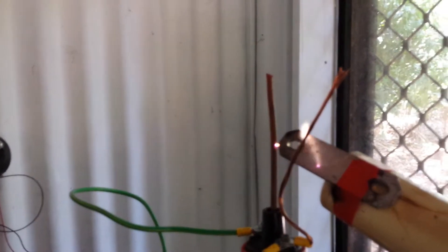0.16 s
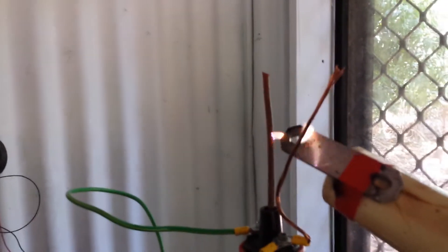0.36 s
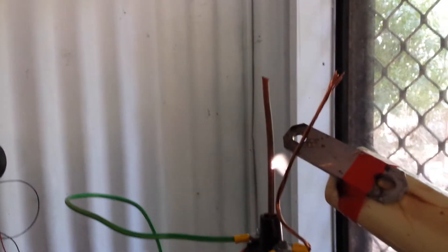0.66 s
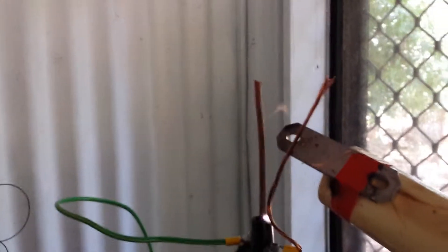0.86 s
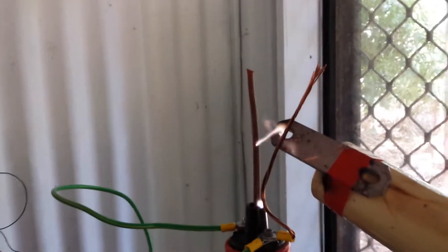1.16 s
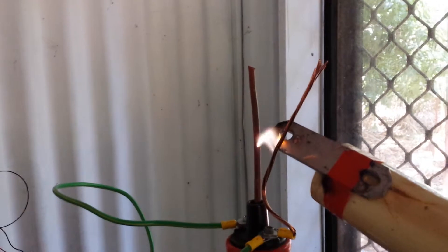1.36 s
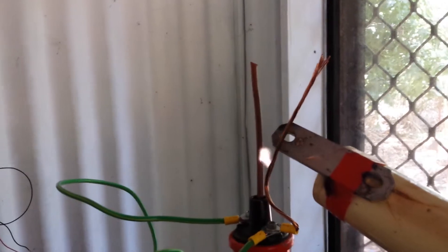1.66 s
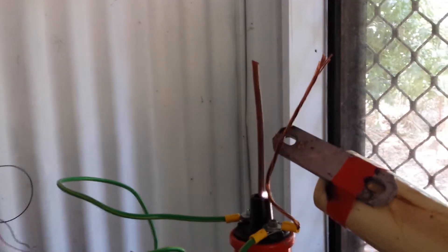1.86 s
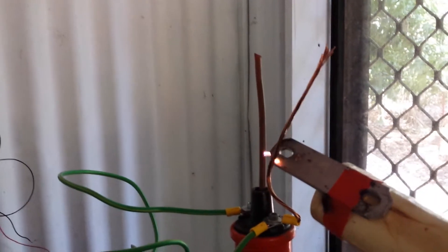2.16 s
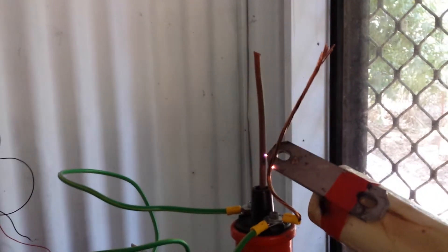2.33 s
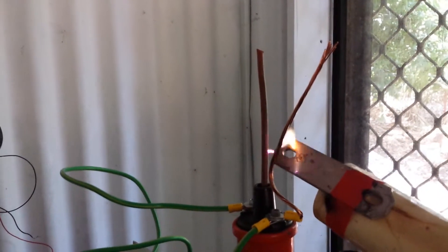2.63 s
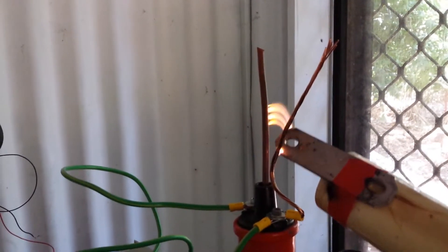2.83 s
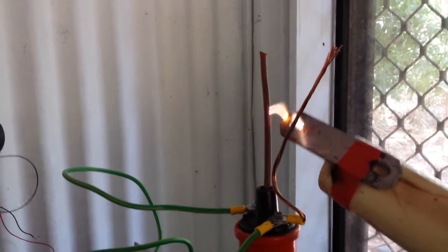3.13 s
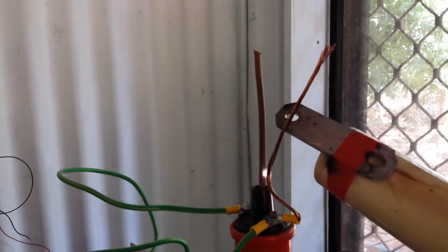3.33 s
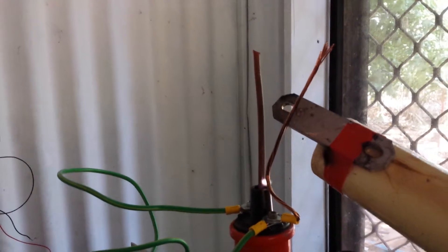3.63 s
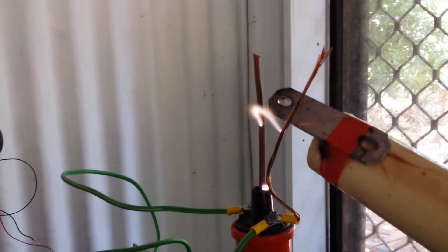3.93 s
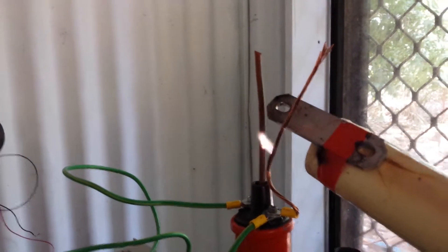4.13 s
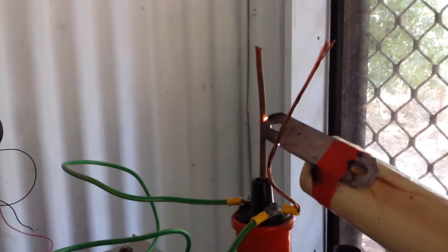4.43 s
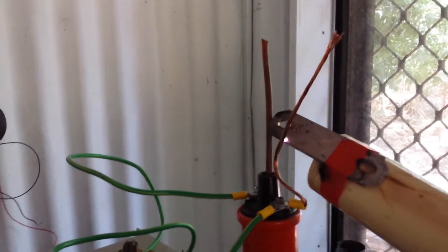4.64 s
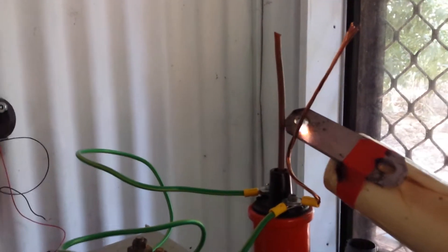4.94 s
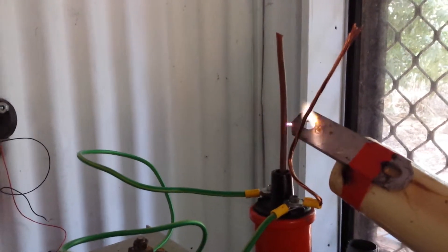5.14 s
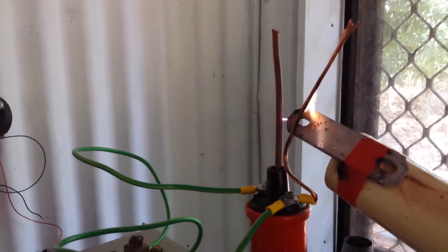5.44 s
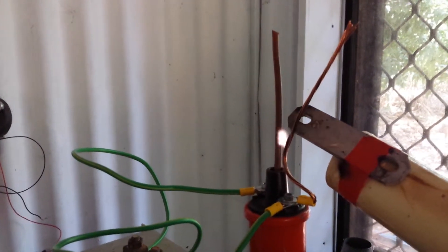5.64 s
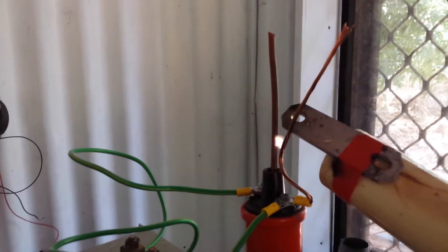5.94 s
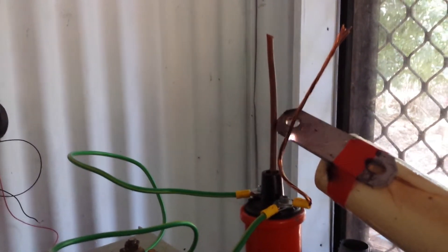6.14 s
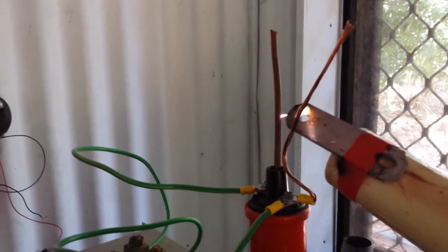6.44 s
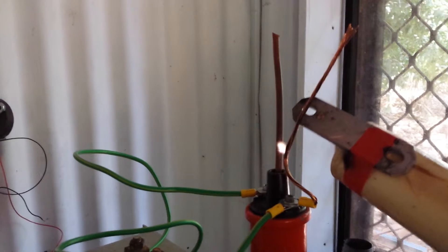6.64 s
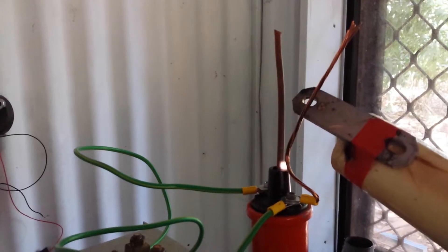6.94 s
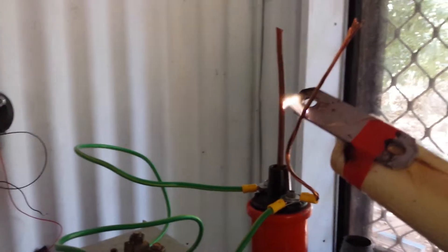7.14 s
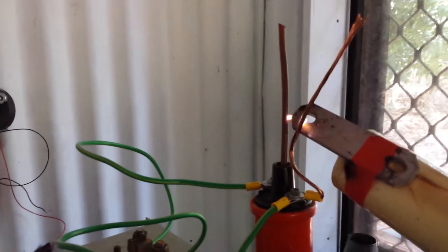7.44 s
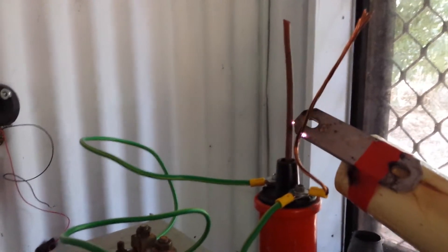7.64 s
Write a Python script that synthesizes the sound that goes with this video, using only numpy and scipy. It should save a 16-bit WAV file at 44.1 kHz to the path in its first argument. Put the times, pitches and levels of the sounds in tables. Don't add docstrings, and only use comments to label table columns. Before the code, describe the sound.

A small high-voltage arc buzzes, whistles shrilly and hisses between two wires, crackling with hard snaps in a tin-walled room.

```python
import sys
import numpy as np
from scipy import signal
from scipy.fft import rfft, irfft
from scipy.io import wavfile
from scipy.ndimage import uniform_filter1d

SR = 44100
rng = np.random.default_rng(int(sys.argv[2]) if len(sys.argv) > 2 else 0)


def natural_amplitude(level_db):
    exponent = np.asarray(level_db, float) / 20
    return 10 ** exponent


def inscribe(sig):
    pcm = np.round(np.clip(np.atleast_2d(sig).T, -1, 1) * 32767)
    wavfile.write(sys.argv[1], SR, pcm.astype(np.int16))


N = 343539

# time in seconds, lag in half-waves.
MAINS_LAG = [(0, .07), (.4, .2), (1, .44), (1.35, .57), (2.05, .83), (2.5, .94), (2.85, 1.02),
             (3.35, 1.085), (4, 1.16), (4.75, 1.18), (5.5, 1.2), (6, 1.19), (6.5, 1.165), (7, 1.13),
             (7.79, 1.07)]
# time in seconds, whistle level in dB.
VIGOUR = [(0, -21), (.7, -19.5), (1.05, -19), (1.19, -26.5), (1.32, -21), (2.1, -19.5), (3.15, -20),
          (3.35, -25), (3.65, -21), (4.2, -20), (4.42, -23.5), (5.25, -20), (5.47, -23), (6.15, -20),
          (6.5, -23.5), (7.2, -16.5), (7.45, -25), (7.79, -17)]
# break in seconds, climb in seconds, whistle gain in dB, sputter gain in dB.
CLIMBS = [(.18, .09, 2, 8.5), (0.307, .13, 8.5, 9.5), (0.523, 0.066, 5, 8), (.63, .09, 6, 9),
          (0.947, .16, 3, -1.5), (1.46, .1, 8, 10.5), (1.671, .15, 7.5, 7), (1.805, .1, 3, 6.5),
          (2.004, .17, 7, 10), (2.352, .14, 1.5, 9.5), (2.732, .12, 3.5, 7), (2.978, .07, 3, 4.5),
          (3.072, .06, 3.5, 4.5), (3.187, .13, 9, 9), (3.846, .11, 7.5, 8), (4.016, .09, 5.5, 9),
          (4.148, .075, 7.5, 7), (4.307, .11, 7, 8.5), (4.624, .13, 10, 9), (4.957, 0.12, 3.5, 6),
          (5.121, .1, 7, 8.5), (5.347, 0.21, 9.5, 12.5), (5.637, .12, 4.5, 12), (5.75, .1, 9.5, 11.5),
          (6.063, 0.21, 4, 9), (6.393, 0.16, 3, 4), (6.638, .08, 6, 4.5), (6.782, 0.12, 7, 9),
          (6.924, .085, 10, 10), (7.018, .09, 5.5, 8.5)]
# peak in seconds, gain of the half-pitch whistle in dB.
STUMBLES = [(.21, 9), (.95, 7), (.31, 11), (.55, 15), (.64, 4), (1.36, 16.5), (2.005, 4), (1.06, 11),
            (1.2, 14), (1.7, 13), (1.9, 7), (2.36, 5), (2.43, 4), (2.62, -3), (3.05, 20.5), (3.13, 16),
            (3.23, 19), (3.741, 22.5), (3.858, 12), (4.016, 15), (4.13, 16), (4.19, 8), (4.535, 13),
            (4.635, 12.5), (4.88, 21), (5.128, 16), (5.231, 19), (5.285, 5), (5.37, 20), (5.62, -2),
            (5.72, 10), (5.8, 9), (6.0, 3), (6.5, 14), (7.26, 12), (7.52, 15.5), (6.281, 18.5),
            (6.398, 20.5), (6.59, 22.5), (6.68, 16.5), (7.2, 14), (7.685, 14), (7.734, 16.5)]
# time in
# seconds, peak in dB, ring in Hz.
STRONG_STRIKES = [(0.1416, -6, 2200), (0.1516, -6, 4130), (0.1617, -6, 2280), (0.1813, -7, 3360),
                  (0.2844, -6, 4130), (0.5034, -5, 2240), (0.5335, -5, 2500), (0.6362, -5, 6500),
                  (0.9953, -7, 6680), (1.3269, -7, 5560), (1.357, -7, 5510), (1.4278, -5, 2110),
                  (1.4484, -4, 2070), (1.6188, -6, 2200), (1.6497, -5, 2200), (1.7393, -7, 2150),
                  (1.7589, -7, 3100), (1.7802, -3, 6120), (1.8191, -6, 6070), (1.8895, -7, 7190),
                  (1.9498, -7, 5730), (2.01, -7, 7970), (2.2614, -6, 2070), (2.3538, -6, 5810),
                  (2.3814, -7, 6720), (2.7226, -7, 2800), (3.0351, -7, 5900), (3.1538, -7, 3010),
                  (3.4744, -7, 5990), (3.4944, -7, 5900), (3.5345, -7, 6240), (3.6749, -7, 5770),
                  (3.745, -7, 6160), (3.8574, -6, 5770), (3.9558, -6, 5810), (3.9955, -4, 3100),
                  (4.0055, -7, 3190), (4.0666, -7, 5510), (4.1458, -7, 5430), (4.5467, -6, 6630),
                  (4.6284, -7, 5680), (4.8978, -7, 5900), (4.9668, -7, 5770), (5.0469, -7, 5730),
                  (5.1875, -6, 5730), (5.2285, -7, 6800), (5.2376, -6, 5640), (5.3072, -7, 5510),
                  (5.6083, -6, 6930), (6.049, -6, 5640), (6.5781, -7, 6550), (6.6081, -7, 5640),
                  (7.0283, -5, 5860), (7.3184, -6, 5770), (7.3584, -6, 6550), (7.3684, -7, 6630),
                  (7.5484, -7, 5680), (7.5584, -7, 7410), (7.6784, -6, 6330), (7.7385, -7, 2020),
                  (0.1516, -6, 4090), (0.1617, -6, 2560), (0.302, -5, 5940), (0.5034, -5, 2150),
                   (0.5335, -5, 4130), (0.6362, -5, 6420), (1.3169, -6, 6870), (1.3777, -5, 6800),
                   (1.4073, -4, 6700), (1.4278, -5, 2110), (1.4484, -4, 2150), (1.6188, -6, 2150),
                   (1.6497, -5, 4050), (1.7802, -3, 2820), (1.8092, -2, 5400), (2.0026, -4, 6290),
                   (2.7352, -3, 5620), (3.1144, -3, 6650), (3.1748, -6, 6440), (3.1839, -6, 7000),
                   (3.6548, -6, 5960), (3.7149, -4, 5900), (3.7554, -5, 5840), (3.7751, -6, 5900),
                   (3.7855, -5, 6440), (3.9955, -4, 3190), (4.0155, -3, 6220), (4.1357, -5, 5730),
                   (4.1577, -4, 5940), (4.9072, -5, 6610), (4.918, -5, 7080), (4.9968, -6, 6610),
                   (5.0669, -6, 5990), (5.1289, -3, 5960), (5.2376, -6, 5750), (5.3474, -4, 5860),
                   (5.7076, -5, 5170), (5.7504, -5, 6120), (6.049, -6, 2690), (6.07, -5, 7430),
                   (6.2684, -5, 5790), (6.6186, -6, 5840), (6.6286, -5, 6500), (6.7187, -6, 6570),
                   (6.7582, -6, 5300), (6.7783, -2, 5810), (6.7883, -3, 6030), (6.8187, -6, 6400),
                   (6.8286, -6, 6630), (6.8691, -3, 6440), (7.0206, -2, 6460), (7.0789, -3, 5920),
                   (7.0889, -3, 6400), (7.1188, -4, 6500), (7.1789, -5, 6440), (7.1888, -5, 6520),
                   (7.2288, -5, 5790), (7.5384, -6, 7190), (7.6985, -6, 5810), (7.7585, -4, 7170)]
# time in seconds, level in dB.
BREAKDOWN = [(0, -0.5), (.6, -2.5), (.8, -1), (1.45, 0), (2.15, -2), (2.5, -3.5), (3.13, -3.5), (3.27, 0),
             (3.55, 0.5), (4.25, -1.5), (4.4, -6.5), (4.8, -2), (4.95, 1), (5.5, -5), (6.5, -4), (6.75, 1),
             (7.2, 1.5), (7.47, -2), (7.79, -3)]
# frequency in Hz, gain in dB.
SNAP_COLOUR = [(300, -32), (1000, -15), (1600, -1), (2200, 1.5), (3000, 0.5), (4300, 2), (6500, -4.5),
               (8500, -10.5), (11000, 0.5), (14000, -6)]
# frequency in Hz, gain in dB.
SPUTTER_COLOUR = [(300, -49.5), (1000, -9.5), (2200, 6), (3000, 6), (4000, 5), (5000, 4.5), (6500, 10),
                  (8500, 1), (10500, 2), (12500, -4.5), (14000, 3)]
# time in seconds, level in dB.
FOULING = [(0, -0.77), (.3, 1.04), (1.2, -1), (1.5, -1), (1.75, 1), (2.3, -1.77), (2.7, 1.63), (2.95, 1.5),
           (3.15, 1.5), (3.3, -3.5), (3.68, -4.5), (3.8, .4), (4.1, -1), (4.45, 0), (4.55, 0.5), (4.75, -2),
           (5.43, -2.5), (5.55, 1), (6.3, 0.8), (6.9, -2), (7.79, 0.8)]
# time in seconds, frequency in Hz.
CHANNEL = [(0.0, 3761), (1.34, 4000), (1.71, 3660), (4.23, 3907), (4.29, 2963), (4.38, 3670), (5.21, 3915),
           (5.27, 3130), (5.4, 4070), (5.71, 3100), (5.84, 4100), (5.99, 3430), (6.68, 4206), (6.77, 3210),
           (6.83, 3990), (6.99, 2866), (7.12, 4073), (7.79, 3840)]
# frequency in Hz, gain in dB.
CORONA_COLOUR = [(5000, -30.5), (6000, -8.5), (7100, 7.5), (7600, -4), (9000, -29.5)]
# frequency in Hz, gain in dB.
SUPPLY_HISS_COLOUR = [(6000, -24), (8000, 3.5), (10000, -2), (12500, -6), (13500, -2.5)]
# start in seconds, length in seconds, level in dB.
HUM_BURSTS = [(0.099, 0.11, -45), (0.224, 0.052, -42), (0.577, 0.047, -44), (0.904, 0.038, -48),
              (1.792, 0.047, -49), (1.86, 0.069, -47), (1.95, 0.049, -40), (2.221, 0.047, -51),
              (2.285, 0.064, -43), (2.626, 0.067, -46), (3.136, 0.048, -44), (4.458, 0.054, -57),
              (4.76, 0.057, -51), (4.864, 0.052, -50.5), (5.434, 0.105, -51), (5.614, 0.044, -43.5),
              (5.996, 0.045, -46), (6.154, 0.039, -53), (6.485, 0.023, -48), (6.857, 0.063, -48),
              (6.977, 0.055, -43.5), (7.48, 0.025, -50)]
# frequency in Hz, density in dB per Hz.
ROOM_TONE = [(60, -31.5), (150, -31), (210, 0.5), (400, 4.5), (500, -16.5), (680, -2.5), (900, 0.5),
             (1000, -32), (1100, 5.5), (1300, -4.5), (1800, -1.5), (3000, -37)]
# time in seconds, level in dB.
ROOM_TONE_DB = [(0, -39), (.3, -37), (1, -41.5), (2.2, -37), (3.6, -42), (4.4, -43), (5.1, -40),
                (6.7, -41.5), (7.79, -42)]
# frequency in Hz, width in Hz, level in dB.
DRONES = [(217.9, 7.8, -53), (345.7, 8.3, -52), (392.8, 12, -53), (666.7, 5.8, -50), (791.5, 7.2, -58.5),
          (881, 7.2, -58), (1502, 6.4, -53.5)]
# frequency in Hz, gain in dB.
MIC_TOP = [(5000, 3), (9000, 14.5), (12000, 1.5), (13300, -4.5), (14400, -3.5)]
# frequency in Hz, share of the time lost.
DROPPED = [(130, .04), (215, .09), (390, .05), (474, .5), (560, .7), (645, .12), (905, .35), (990, .97),
           (1075, .28), (1300, .55), (1480, .18), (1600, .4), (1850, .05), (7500, .0), (10000, .2),
           (12000, .25), (13200, .0)]

HALF_WAVES_PER_S = 99.9
EARLIEST_STRIKE, ARCH_LAG = .13, .04
SWITCHING_HZ = 14450
HELD_SHARE = .35
WHISTLE_DIES_S, SPUTTER_DIES_S = .015, .05
SPUTTER_DB, SPUTTER_FOLLOWS = -28, 1.3
STUMBLE_RISE_S, STUMBLE_FALL_S = 0.035, 0.061
HALF_DB, HALF_FOLLOWS = -30, 0.61
LONG_ARC_LOSS_DB = -2
SNAP_RING_HZ, SNAP_RING_SPREAD_HZ = 6400, 840
RING_CYCLES, RING_LONGEST_S = 19, 0.004
SNAP_DB, HARD_SNAP_DB, HARD_RING_DB = -8, 4, -4.5
WIRE_RING_HZ, WIRE_RING_T60_S, WIRE_RING_DB = 2332, 0.0048, -14.5
WIRE_FOLLOWS = .35
CHANNEL_SAG_HZ_PER_DB, CHANNEL_WANDER_HZ = 12, 90.47
CORONA_DB = -5
CORONA_EDGE_HZ, CORONA_EDGE_HZ_PER_DB = 13200, 90
CORONA_LOW_DB, CORONA_LOW_FOLLOWS = -11.5, 0.25
HUM_EDGE_S, HUM_OFFSET = 0.0024, .2
HAND_DRIFT_HZ = 1.3


def rms_one(x):
    return x / np.sqrt(np.mean(x ** 2) + 1e-20)


def in_time(rows):
    s, value = np.transpose(rows)
    return np.interp(np.arange(N) / SR, s, value)


def coloured(x, points, size=4096):
    hz, db = np.transpose(points)
    bins_hz = np.arange(size // 2 + 1) * SR / size
    cepstrum = irfft(np.log(natural_amplitude(np.interp(np.log(bins_hz + 1), np.log(hz), db))))
    cepstrum[1:size // 2] *= 2
    cepstrum[size // 2 + 1:] = 0
    return signal.fftconvolve(x, irfft(np.exp(rfft(cepstrum))))[:N]


def flicker(hz):
    low = signal.butter(2, hz, fs=SR, output="sos")
    return rms_one(signal.sosfilt(low, rng.standard_normal(N + SR))[SR:])


def swells(corners_s, gains_db):
    out = np.zeros(N)
    for corners, gain_db in zip(corners_s, gains_db):
        span = slice(max(int(corners[0] * SR), 0), int(corners[-1] * SR))
        shape = np.interp(np.arange(N)[span] / SR, corners, [0, 1, 1, 0])
        out[span] = np.maximum(out[span], gain_db * shape)
    return out


def stretch_of(whistle_db):
    return np.clip((whistle_db + 21.0) / 9, 0, 1)


def arc_state():
    vigour_db = in_time(VIGOUR)
    s, climb_s, whistle_gain_db, sputter_gain_db = np.transpose(CLIMBS)
    start, held = s - climb_s, s - HELD_SHARE * climb_s
    whistle_db = vigour_db + swells(np.c_[start, held, s, s + WHISTLE_DIES_S], whistle_gain_db)
    lift_db = swells(np.c_[start, held, s, s + SPUTTER_DIES_S], sputter_gain_db)
    sputter_db = SPUTTER_DB + SPUTTER_FOLLOWS * (vigour_db + 21) + lift_db + in_time(FOULING)

    s, gain_db = np.transpose(STUMBLES)
    stumble_db = swells(np.c_[s - STUMBLE_RISE_S, s, s, s + STUMBLE_FALL_S], gain_db)
    half_db = HALF_DB + HALF_FOLLOWS * (vigour_db + 22.5) + stumble_db
    half_db -= LONG_ARC_LOSS_DB * stretch_of(whistle_db)

    sag_hz = CHANNEL_SAG_HZ_PER_DB * (sputter_db - SPUTTER_DB)
    channel_hz = in_time(CHANNEL) - sag_hz + CHANNEL_WANDER_HZ * flicker(6)
    return whistle_db, channel_hz, half_db, sputter_db


def mains():
    turns = HALF_WAVES_PER_S * np.arange(N) / SR - in_time(MAINS_LAG) + EARLIEST_STRIKE + 2.025
    return turns.astype(int), turns % 1


def burning(wave, place, whistle_db):
    scatter = rng.exponential(1, wave[-1] + 1)[wave]
    return place > EARLIEST_STRIKE + .03 * stretch_of(whistle_db) ** 2 + .005 * scatter


def whistles(wave, place, lit, whistle_db, half_db):
    late = place - ARCH_LAG
    voltage = np.clip(1.06 * np.sin(np.pi * late), 1e-9, 1)
    luck = rng.standard_normal((wave[-1] + 1, 3))[wave].T
    stretch = stretch_of(whistle_db)
    top_hz = (SWITCHING_HZ - 170 * stretch) * (1 + .003 * luck[0])
    sag = .08 + .05 * np.clip((whistle_db + 26) / 6, 0, 1) + .1 * stretch ** 2
    turns = np.cumsum(top_hz * voltage ** sag) / SR
    half_turns = np.cumsum(top_hz * voltage ** .05) / SR / 2

    on = lit * (np.abs(late - .5) < .33 + .08 * stretch ** 2)
    power = uniform_filter1d(on * voltage ** (.5 + 1.3 * stretch), size=12)
    unsteady = 1 - .8 * stretch
    full_level = power * natural_amplitude(2.4 * unsteady * luck[1] + 1.4 * unsteady * flicker(920))
    full = full_level * np.sin(2 * np.pi * turns + 0.19 * unsteady * flicker(600))
    half_level = power * natural_amplitude(2.4 * luck[2] + 1.2 * flicker(400))
    half = half_level * np.sin(2 * np.pi * half_turns + .4 * flicker(800))
    return natural_amplitude(whistle_db - 0.7) * rms_one(coloured(full, MIC_TOP)) + natural_amplitude(half_db - 12.0) * rms_one(half)


def strikes(wave, lit, sputter_db):
    clicks, rings = np.zeros(N), np.zeros(N + SR)
    listed = {row[0]: row for row in STRONG_STRIKES}
    s, peak_db, ring_hz = np.transpose(list(listed.values()))
    hard = ((s - .00006) * SR).astype(int)
    at = np.flatnonzero(np.diff(lit.astype(int)) > 0)
    at = at[np.abs(at[:, None] - hard).min(axis=1) > SR / HALF_WAVES_PER_S / 2]
    luck = rng.standard_normal((wave[-1] + 1, 2))[wave[at]].T
    force_db = 3.2 * np.clip(luck[0], -3, .6) - .8 + in_time(BREAKDOWN)[at]

    common_db = .45 * (sputter_db[at] + 26) + SNAP_DB + force_db
    ring_db = np.r_[.2 * sputter_db[at] - 4 + force_db, peak_db + HARD_RING_DB]
    ring_hz = np.r_[SNAP_RING_HZ + SNAP_RING_SPREAD_HZ * luck[1], ring_hz]
    at = np.r_[at, hard]
    clicks[at] = natural_amplitude(np.r_[common_db, peak_db + HARD_SNAP_DB])
    age = np.arange(SR // 100) / SR
    for i, level_db, hz in zip(at, ring_db, ring_hz):
        t60_s = min(RING_CYCLES / hz, RING_LONGEST_S)
        rings[i:i + len(age)] += natural_amplitude(level_db - 60 * age / t60_s) * np.sin(2 * np.pi * hz * age)

    wire = natural_amplitude(WIRE_RING_DB - 60 * age / WIRE_RING_T60_S) * np.sin(2 * np.pi * WIRE_RING_HZ * age)
    jolts = clicks * natural_amplitude(WIRE_FOLLOWS * (sputter_db - SPUTTER_DB))
    snaps = coloured(clicks, SNAP_COLOUR) + signal.fftconvolve(jolts, wire)[:N]
    thin = signal.butter(2, 1100, "high", fs=SR, output="sos")
    return signal.sosfilt(thin, snaps) + rings[:N]


def sputter(place, lit, sputter_db, channel_hz, stretch):
    fading = lit * natural_amplitude(-9.5 * place + 2.0 * flicker(160))
    sizes = natural_amplitude(3.5 * np.minimum(rng.exponential(1, N), 4)) * rng.choice([-1, 1], N)
    grains = rms_one(sizes * (rng.random(N) < 2500 / SR))
    hiss = 0.46 * rng.standard_normal(N)
    broad = rms_one(coloured(fading * (grains + hiss), SPUTTER_COLOUR))
    channel = rms_one(fading * flicker(270) * np.sin(2 * np.pi * np.cumsum(channel_hz) / SR))
    both = natural_amplitude(-LONG_ARC_LOSS_DB * stretch) * broad + natural_amplitude(0.84 * sputter_db + 5.5) * channel
    return natural_amplitude(sputter_db - 4.0) * both


def corona():
    vigour_db = in_time(VIGOUR)
    spread = signal.sosfilt(signal.butter(6, 800, fs=SR, output="sos"), rng.standard_normal(N))
    centre_hz = CORONA_EDGE_HZ + 800 - CORONA_EDGE_HZ_PER_DB * (vigour_db + 21)
    shifted = spread * np.sin(2 * np.pi * np.cumsum(centre_hz) / SR)
    high = rms_one(coloured(shifted, [(13000, -5.5), (14300, 2.0)]))
    low = rms_one(coloured(rng.standard_normal(N), CORONA_COLOUR))
    low_gain = natural_amplitude(CORONA_LOW_DB + CORONA_LOW_FOLLOWS * (vigour_db + 20))
    return natural_amplitude(vigour_db + CORONA_DB + 0.48 * flicker(150)) * (high + low_gain * low)


def supply_hiss():
    return natural_amplitude(-39) * rms_one(coloured(rng.standard_normal(N), SUPPLY_HISS_COLOUR))


def hum_bursts(place):
    level = np.zeros(N)
    for s, length_s, db in HUM_BURSTS:
        first, count = int((s - HUM_EDGE_S) * SR), int((length_s + 2 * HUM_EDGE_S) * SR)
        level[first:first + count] += natural_amplitude(db + 4) * np.hanning(count)
    return level * (np.sin(2 * np.pi * place) + HUM_OFFSET)


def room(x, wet, t60_s=0.2, wall_db=-8, count=3):
    age = np.arange(SR // 3) / SR
    tails = rng.standard_normal((count, len(age))) * natural_amplitude(-60 * age / t60_s) * (age > .003)
    tails *= natural_amplitude(0.5) / np.sqrt(np.sum(tails[0] ** 2))
    sent = wet * x
    sent = np.r_[sent[:len(age)], sent]
    out = x + natural_amplitude(wall_db) * np.roll(sent, round(.0015 * SR))[len(age):]
    turn = 2 * np.pi * HAND_DRIFT_HZ * np.arange(len(sent)) / SR
    for k, tail in enumerate(tails):
        share = np.sqrt(2 / count) * np.cos(turn + np.pi * k / count)
        out += signal.fftconvolve(share * sent, tail)[len(age):len(age) + N]
    return out


def room_tone():
    out = rms_one(coloured(rng.standard_normal(N), ROOM_TONE))
    for hz, width_hz, db in DRONES:
        b, a = signal.iirpeak(hz, hz / width_hz, fs=SR)
        out += natural_amplitude(db + 43.0) * rms_one(signal.lfilter(b, a, rng.standard_normal(N)))
    return natural_amplitude(in_time(ROOM_TONE_DB) + 1.5 * flicker(6)) * out


def recorder_rumble():
    return natural_amplitude(-86) * flicker(140)


def scene():
    whistle_db, channel_hz, half_db, sputter_db = arc_state()
    stretch = stretch_of(whistle_db)
    wave, place = mains()
    lit = burning(wave, place, whistle_db)
    arc = whistles(wave, place, lit, whistle_db, half_db)
    arc += strikes(wave, lit, sputter_db)
    arc += sputter(place, lit, sputter_db, channel_hz, stretch)
    arc += corona() + supply_hiss()
    in_room = room(arc, wet=1 - .55 * stretch)
    heard = np.clip(in_room + room_tone(), -.78, .78)
    no_rumble = signal.butter(6, 185, "high", fs=SR, output="sos")
    return (signal.sosfilt(no_rumble, heard) + hum_bursts(place) + recorder_rumble())[None]


def lose_weak_bands(x, size=2048, count=4):
    hz, _, frames = signal.stft(x, SR, "cosine", size)
    first = np.arange(0, len(hz), count)
    power = np.add.reduceat(np.abs(frames) ** 2, first)
    power = uniform_filter1d(power, size=3, axis=1) + 1e-20
    around = uniform_filter1d(np.log(power), size=11, axis=0)
    masking = np.interp(hz[first], [700, 950, 1050, 2000, 8000, 11000], [.7, .9, 0, .2, .85, 1.3])[:, None]
    need = np.log(power) - np.clip(1 - masking, 0, 1) * .45 * around
    need -= masking * np.log(power.sum(axis=0))
    rank = need.argsort(axis=1).argsort(axis=1) / need.shape[1]
    lost_share = np.interp(hz[first] + 2 * hz[1], *np.transpose(DROPPED))
    kept = rank >= lost_share[:, None]
    gain = np.where(kept, 1, .01)[np.arange(len(hz)) // count]
    return signal.istft(frames * gain, SR, "cosine", size)[1][:N]


def roll_off(x):
    return signal.sosfilt(signal.butter(12, 15900, fs=SR, output="sos"), x)


def record(dry):
    x = lose_weak_bands(dry[0])
    top_cut = signal.ellip(8, .3, 28, 14500, fs=SR, output="sos")
    x = signal.sosfiltfilt(top_cut, x)
    return roll_off(x[None])


dry = scene()
out = record(dry)
inscribe(out)
```